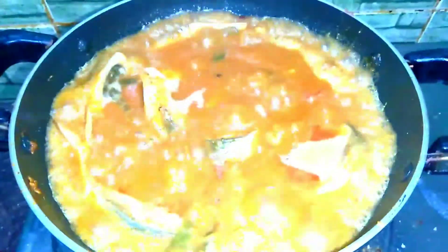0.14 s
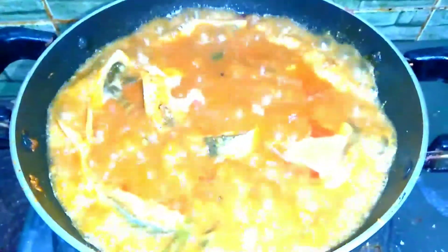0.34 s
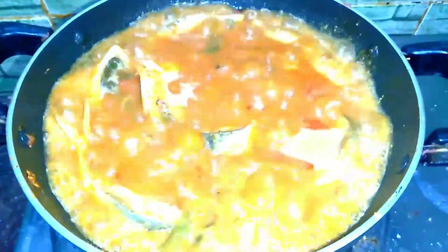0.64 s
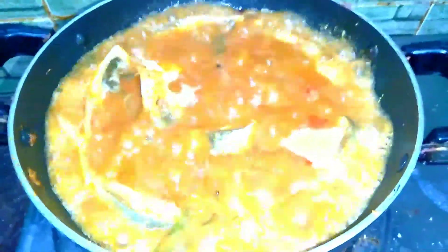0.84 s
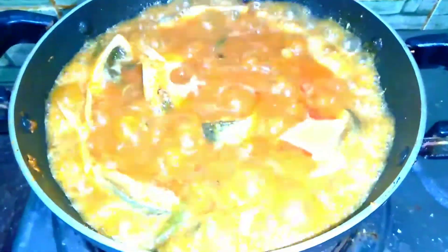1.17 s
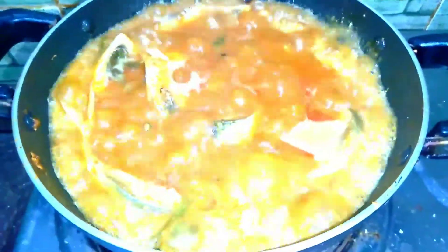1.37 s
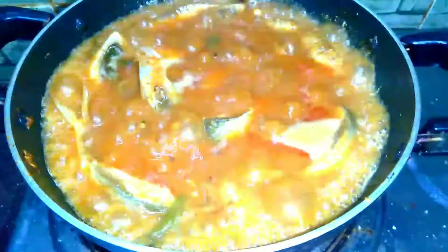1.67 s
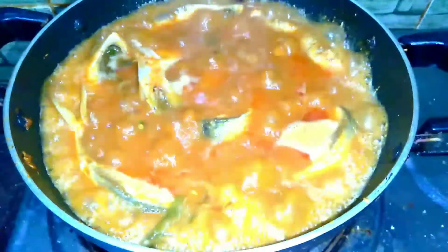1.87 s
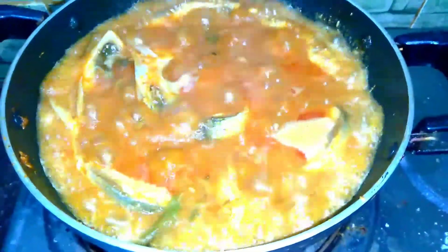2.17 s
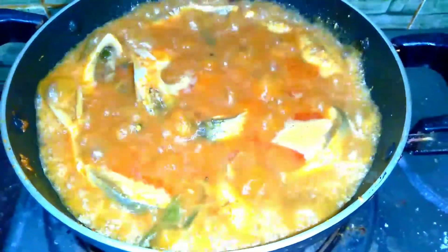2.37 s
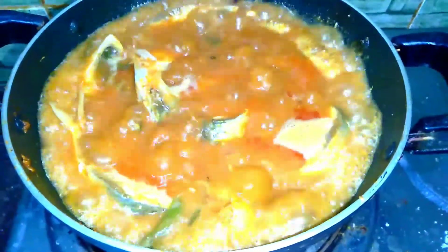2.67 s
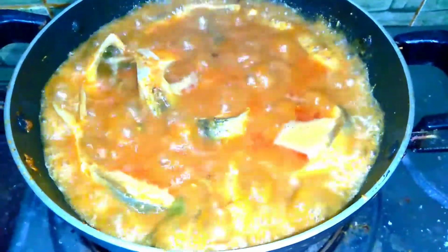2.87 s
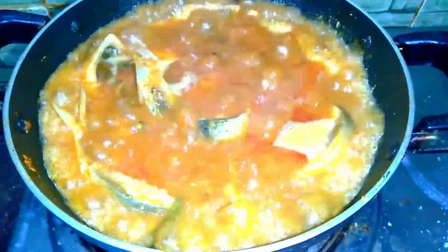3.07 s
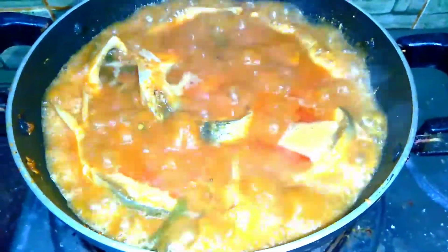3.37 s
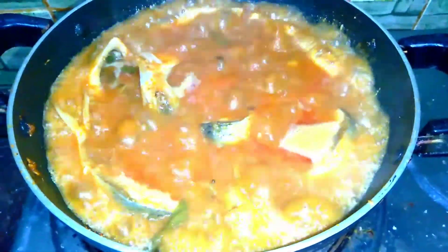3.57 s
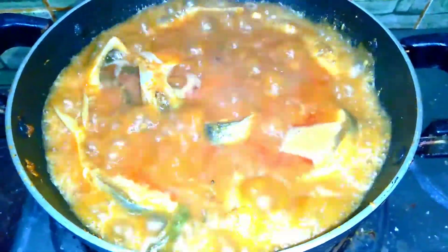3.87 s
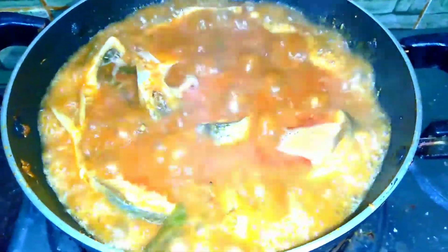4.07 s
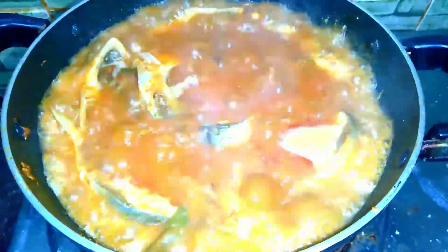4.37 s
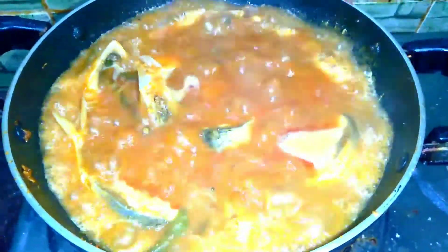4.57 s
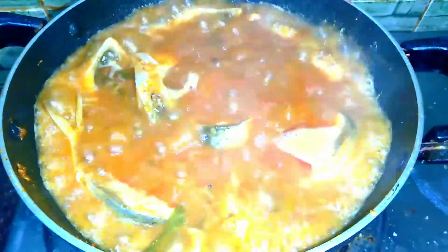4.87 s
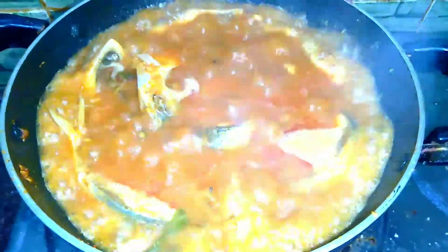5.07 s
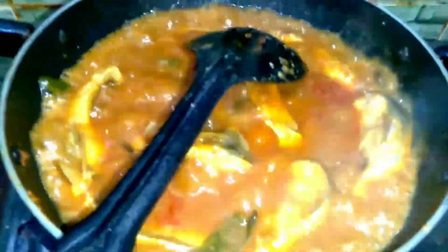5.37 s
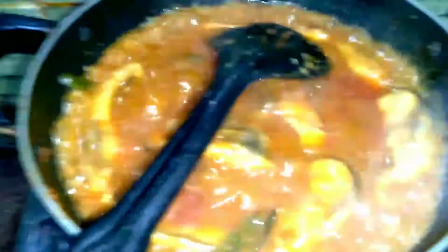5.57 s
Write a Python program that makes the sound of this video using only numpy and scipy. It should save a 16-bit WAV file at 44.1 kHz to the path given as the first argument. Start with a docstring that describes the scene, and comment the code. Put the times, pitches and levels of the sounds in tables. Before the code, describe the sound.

Thick gravy bubbles in a pan on a stove, heard close and dry. A loud cluster of pops opens it, then near quiet, then a busy run of crackles, thumps and a glug. From two seconds a faint high chirr continues under isolated snaps and soft hiss.

```python
"""Gravy simmering in a pan

Thick gravy simmers, heard dry and close, with deep bass rolled off and nothing above about 16 kHz.
Clumped random snaps in coloured noise make short gusts of sizzle; decaying resonances make sharp
pops, dull thumps and glugs. From two seconds on, two narrow noise bands form a chirr and a low burble
is heard. Filtered noise patches add streaks and wide puffs of hiss, over a very faint flickering floor."""
import sys
import numpy as np
from scipy import signal
from scipy.fft import rfft, irfft
from scipy.io import wavfile

SR = 44100
rng = np.random.default_rng(int(sys.argv[2]) if len(sys.argv) > 2 else 0)


def output_pcm(signal):
    """Save a mono or channel-first signal as 16-bit PCM at the path in sys.argv[1].

    Samples are clipped to [-1, 1] before scaling.
    """
    pcm = np.clip(np.atleast_2d(signal).T, -1, 1) * 32767
    wavfile.write(sys.argv[1], SR, np.round(pcm).astype(np.int16))


N = 251811


def amp(db):
    """Decibel law: level to amplitude gain."""
    return 10 ** (np.asarray(db) / 20)


def rms_one(x):
    """Power normalisation: scale to rms 1."""
    return x / np.sqrt(np.mean(x ** 2) + 1e-20)


def band(x, low_hz, high_hz, order=4):
    """Band-pass filtering (Butterworth), then scaling to rms 1."""
    sos = signal.butter(order, [low_hz, high_hz], "band", fs=SR, output="sos")
    return rms_one(signal.sosfilt(sos, x))


def coloured(x, spectrum):
    """Spectral shaping: weight a white signal by a curve over log frequency, rms 1."""
    hz, db = np.transpose(spectrum)
    log_hz = np.log(np.maximum(np.fft.rfftfreq(N, 1 / SR), 1))
    gain = amp(np.interp(log_hz, np.log(hz), db))
    return rms_one(irfft(rfft(x) * gain, N))


def split(x, edges_hz, sharpness=42.0):
    """Complementary crossover: neighbouring bands without a gap, each of rms 1."""
    hz = np.maximum(np.fft.rfftfreq(N, 1 / SR), 1)
    above = [np.ones(len(hz))]
    above += [1 / (1 + (edge / hz) ** sharpness) for edge in edges_hz]
    above += [np.zeros(len(hz))]
    spectrum = rfft(x)
    return np.array([rms_one(irfft(spectrum * (a - b), N)) for a, b in zip(above, above[1:])])


def shifted(x, shift_hz):
    """Single-sideband modulation: move a band by a number of Hz that may change in time."""
    phase = 2 * np.pi * np.cumsum(shift_hz) / SR
    return np.real(signal.hilbert(x) * np.exp(1j * phase))


def streaky(depth_db, hold_s, rarity=0., size=512, count=3):
    """Random modulation: narrow bands of white noise, count bins wide, flicker independently."""
    frames = signal.stft(rng.standard_normal(N), nperseg=size)[2]
    r = np.exp(-size / 2 / SR / hold_s)
    wander = signal.lfilter([1], [1, -r], rng.standard_normal(frames.shape), axis=1)
    wander *= np.sqrt(1 - r * r)
    wander = wander[np.arange(len(frames)) // count]
    flicker_db = depth_db * np.tanh(2 * (wander - rarity))
    return rms_one(signal.istft(frames * amp(flicker_db), nperseg=size)[1][:N])


def gate(start_s, length_s, first_db, last_db, rise_s, fall_s):
    """Exponential envelope (straight in dB) between linear edges: its place and its gain."""
    a = max(round(start_s * SR), 0)
    b = min(round((start_s + length_s + fall_s) * SR), N)
    t = np.arange(b - a) / SR
    edges = np.clip(np.minimum(t / rise_s, (length_s + fall_s - t) / fall_s), 0, 1)
    level_db = first_db + (last_db - first_db) * np.minimum(t / length_s, 1)
    return slice(a, b), edges * amp(level_db)


def curve_gains(rows):
    """Level interpolation in dB: one gain per column, inaudible before the first row."""
    s, *columns = np.transpose(rows)
    return [amp(np.interp(np.arange(N) / SR, s, c, left=-150)) for c in columns]


def ring(clicks, hz, t60):
    """Damped resonance: a unit click sets a sine of initial height 1 ringing."""
    r, w = amp(-60 / (t60 * SR)), 2 * np.pi * hz / SR
    return signal.lfilter([0, np.sin(w)], [1, -2 * r * np.cos(w), r * r], clicks)


# spectrum of the floor: f/Hz, relative density/dB
FLOOR_SPECTRUM = [(18, -32.5), (30, -0.5), (374, -5), (1590, -16.5), (1810, -21), (1960, -17.5),
                  (16000, -15)]
FLOOR_DB = -77


def floor():
    """Stationary coloured noise: a faint floor whose narrow bands flicker."""
    return amp(FLOOR_DB) * coloured(streaky(depth_db=5.0, hold_s=0.15), FLOOR_SPECTRUM)


# low burble of the simmer: t/s, level/dB
SIMMER_LEVELS = [(2.0, -65.5), (2.42, -71), (2.73, -74.5), (4.67, -75.5), (5.23, -67.5), (5.71, -78.5)]


def simmer():
    """Low-frequency band noise: the burble of the simmer flickers bin by bin."""
    burble = band(streaky(depth_db=8, hold_s=0.08, size=1024, count=1), 29, 125, order=2)
    return curve_gains(SIMMER_LEVELS)[0] * burble


# levels of the chirr: t/s, lower band level/dB, upper band level/dB, hiss around them level/dB
CHIRR_LEVELS = [(2.0, -81, -50.5, -55), (2.14, -66.5, -59, -65), (2.6, -63.5, -58.5, -65.5),
                (3.25, -61.5, -60, -76), (3.71, -63, -59.5, -68), (4.63, -59.5, -62, -73),
                (4.99, -57, -58.5, -69.5), (5.49, -59, -56, -67), (5.71, -57.5, -56, -58.5)]
# each chirr band: lower edge f/Hz, end of the crest f/Hz, end of the shoulder f/Hz
LOWER_CHIRR, UPPER_CHIRR = (3952, 4400, 4780), (7400, 7850, 8450)
# weaker band between the two: lower edge f/Hz, upper edge f/Hz
MIDDLE_CHIRR = (6200, 6800)
# common drift in pitch of the two main bands: t/s, shift f/Hz
CHIRR_DRIFT_HZ = [(2.002, -90), (3.302, 40.5), (3.9, 120.5), (4.302, 1.5), (5, -60), (5.7, 80)]


def chirr(mid_db=-3, flank_db=-12, flank_hz=250, shoulder_db=-5.5):
    """Narrow-band noise: two drifting bands, a weaker one between, thin lines and a faint bed."""
    low, high, around = curve_gains(CHIRR_LEVELS)
    hiss = streaky(depth_db=5.0, hold_s=0.089)
    wavering = streaky(depth_db=8.5, hold_s=0.38)
    lines = streaky(depth_db=15, hold_s=.2, rarity=.9)
    middle = amp(mid_db) * band(wavering, *MIDDLE_CHIRR)
    out = around * (band(lines, 2090, 9000, order=3) + middle)
    out += amp(-31) * high * band(rng.standard_normal(N), 500, 13000, order=2)   # the bed
    drift_hz = np.interp(np.arange(N) / SR, *np.transpose(CHIRR_DRIFT_HZ))
    for gain, (low_hz, crest_hz, high_hz) in ((low, LOWER_CHIRR), (high, UPPER_CHIRR)):
        crest = band(hiss, low_hz, crest_hz, order=3)
        shoulder = amp(shoulder_db) * band(wavering, crest_hz, high_hz, order=4)
        flanks = amp(flank_db) * band(lines, low_hz - flank_hz, high_hz + flank_hz, order=5)
        out += gain * shifted(rms_one(crest + shoulder + flanks), drift_hz)
    return out


PATCH_WANDER, PATCH_WANDER_S = .016, .08   # largest stray as a share of the centre, knot spacing


def patches(rows, hiss, rise_s):
    """Band-limited noise bursts whose pitch strays, from start, length, centre, width and levels."""
    out = np.zeros(N)
    knots = np.arange(0, N / SR + 1, PATCH_WANDER_S)
    stray = rng.uniform(-0.96, 1, len(knots))
    wander = PATCH_WANDER * np.interp(np.arange(N) / SR, knots, stray)
    for start, length, hz, width_hz, db, change_db in rows:
        where, gain = gate(start, length, db, db + change_db, rise_s, fall_s=0.018)
        patch = band(hiss[where], hz - width_hz / 2, hz + width_hz / 2, order=3)
        out[where] += gain * shifted(patch, hz * wander[where])
    return out


# wide puffs of hiss: start t/s, length t/s, centre f/Hz, width f/Hz, first level/dB
PUFF_ROWS = [(0.428, 0.24, 8830, 5890, -65.5), (0.915, 0.26, 2300, 1990, -58),
             (2.085, 1.3, 5650, 6476, -68.5), (2.397, 0.035, 7760, 5000, -41),
             (2.496, 0.27, 5100, 4450, -55.5), (2.51, 0.097, 12800, 2500, -56),
             (3.1, 0.21, 2586, 1115, -61), (3.294, 0.094, 8740, 4970, -51), (3.665, 0.19, 11000, 4270, -54),
             (3.662, 0.24, 6500, 1980, -55), (3.816, 0.032, 8800, 4020, -43.5),
             (4.247, 0.33, 3070, 1460, -54.5), (4.249, 0.25, 7520, 3000, -54.5),
             (4.811, 0.36, 7400, 2660, -47), (4.79, 0.15, 11500, 5300, -48.5),
             (5.065, 0.23, 10900, 3000, -66), (5.573, 0.46, 3240, 1890, -55),
             (5.585, 0.048, 13300, 1980, -64)]
PUFF_FADE_DB, PUFF_RISE_S = -36, 0.019


def puffs():
    """Exponential decay of broad noise: puffs that fade alike and break up into thin lines."""
    broken = streaky(depth_db=8, hold_s=.12, rarity=.1)
    return patches([(*row, PUFF_FADE_DB) for row in PUFF_ROWS], broken, PUFF_RISE_S)


# narrow streaks of hiss: start t/s, length t/s, centre f/Hz, first level/dB, change of level/dB
STREAK_ROWS = [(0, 0.041, 2210, -48, -25), (0.758, 0.014, 1260, -66, 7), (4.684, 0.51, 2694, -65.5, -14.5),
               (0.401, 0.23, 1848, -67, -9.5), (0.44, 0.07, 375, -70.5, -7),
               (0.624, 0.047, 402, -63.5, -11), (0.554, 0.23, 7020, -78.5, 2.5),
               (0.74, 0.031, 2294, -51.5, 2), (0.77, 0.11, 2500, -67.5, -5.5), (0.916, 0.1, 2714, -58.5, 0),
               (0.916, 0.1, 1180, -51, -30), (0.918, 0.056, 1730, -67, -6), (2.082, 1, 2416, -72.5, -18),
               (1.998, 0.15, 495, -59.5, -22), (3.424, 0.069, 3260, -33.5, -11),
               (2.424, 0.1, 343, -62.5, -10.5), (2.884, 0.297, 2790, -64, -4.5),
               (3.429, 0.065, 1334, -55, -14.5), (3.704, .12, 1864, -70.5, -5.5),
               (4.36, 0.092, 800, -68.5, -19), (4.517, 0.16, 3140, -67.5, 10),
               (4.593, 0.3, 2930, -59, -12.5), (4.738, 0.058, 917, -56, -8),
               (4.796, 0.16, 4010, -47.5, -5.5), (4.869, 0.31, 1894, -52.5, -16),
               (5.004, 0.28, 2260, -58, -11), (5.487, 0.067, 676, -72, -6.5)]
# width = base + share of the centre; the share grows when the length nears the spread time
STREAK_WIDTH_HZ, STREAK_WIDTH_SHARE, STREAK_SPREAD_S = 31, 0.068, 0.037
STREAK_RISE_S = 0.014


def streaks():
    """Time-bandwidth reciprocity: fluttering streaks of hiss, broader when they are short."""
    rows = []
    for start, length, hz, db, change_db in STREAK_ROWS:
        share = STREAK_WIDTH_SHARE * (1 + STREAK_SPREAD_S / length)
        rows.append((start, length, hz, STREAK_WIDTH_HZ + share * hz, db, change_db))
    return patches(rows, streaky(depth_db=3.0, hold_s=0.014), STREAK_RISE_S)


# low glugs: t/s, peak level/dB, first f/Hz, last f/Hz, time constant of the drop t/s, t60 t/s
GLUG_ROWS = [(1.4211, -14.5, 1077, 146, 0.00056, 0.014), (1.751, -32.5, 160, 85, 0.0089, 0.096),
             (2.255, -45.5, 282, 121.4, 0.011, 0.18)]


def glugs(rise_share=.7):
    """Gliding damped oscillation: a big bubble heaves out in one swell, sliding down in pitch."""
    out, t = np.zeros(N), np.arange(4000) / SR
    for s, db, first_hz, last_hz, drop_s, t60 in GLUG_ROWS:
        hz = last_hz + (first_hz - last_hz) * np.exp(-t / drop_s)
        swell = (1 - np.exp(-t / (rise_share * drop_s))) * amp(-60 * t / t60)
        wave = np.sin(2 * np.pi * np.cumsum(hz) / SR)
        start = round(s * SR)
        out[start:start + len(t)] -= amp(db) * swell / swell.max() * wave
    return out


# bursting bubbles: t/s, skin peak level/dB, ring f/Hz, thump gain relative to the skin peak level/dB
POP_ROWS = [(0.041, -28.5, 11200, 25.5), (0.0692, -9.5, 8300, -8), (0.086, 2.5, 8200, -22),
            (0.093, -1.5, 5700, -34), (0.0975, -3, 4730, -29), (0.106, -16, 5300, -35),
            (0.1159, 5, 5600, -39), (0.1208, -0.5, 4870, -36), (0.1251, 0, 8400, -8),
            (1.4057, -14, 8900, -37), (1.4055, -24, 1700, -27), (1.413, -6, 9500, -17),
            (1.422, -11, 5400, -28), (1.4922, -19, 5800, -8), (1.492, -24, 2010, -18),
            (1.5102, -25, 1530, -15), (1.6322, -14.5, 8500, -41), (1.705, -4, 8500, -38),
            (1.7055, -17.5, 1380, -15), (1.712, -13.5, 4150, -17), (1.7497, -11.5, 9050, -2),
            (1.753, -17, 4160, -30), (1.799, -26, 686, -15), (1.8808, -7, 3780, -40),
            (1.881, -1, 7550, -18.5), (1.8803, -15.5, 13800, -38), (1.918, -31, 8500, -8),
            (1.944, -13.5, 12600, -15), (1.944, -15, 4400, -28), (1.9509, -11, 4860, -35),
            (1.982, -25.5, 8400, -27), (1.986, -36, 530, 10.5), (2.009, -32, 8100, -25),
            (2.265, -31, 7800, -20), (2.2755, -50, 8300, -12), (2.274, -57, 4250, -1.5),
            (2.68, -21, 7340, 8), (2.677, -16.5, 7100, -1), (2.902, -55, 410, 12.5),
            (4.0251, -18, 4660, -10.5), (4.0285, -31.5, 7950, -18), (4.0274, -13.5, 13000, -15),
            (4.027, -33, 457, -22), (4.746, -50, 1030, -23.5), (4.768, -48.5, 840, -20),
            (4.7693, -23.5, 7700, -27), (4.7865, -31, 8850, -15), (5.224, -13, 7300, -21),
            (5.224, -25, 880, -22)]
POP_CYCLES, POP_LONGEST_S = 13, 0.0097   # t60 of the ring in cycles; thick gravy limits it
CRACK_DB, CRACK_TOP_HZ = -24, 8660
THUMP_HZ, THUMP_T60_S, THUMP_PUSH_S = 147, 0.011, 0.003   # the air is pushed softly


def pops():
    """Impulse response: a bubble's skin cracks and rings a few cycles; the pushed air thumps."""
    size = 4000
    out = np.zeros(N + size)
    cracks = rng.standard_normal((len(POP_ROWS), 40)) * signal.windows.hann(40) ** 2
    cracks = signal.lfilter(*signal.butter(2, CRACK_TOP_HZ, fs=SR), cracks)
    click = np.eye(1, size, 14)[0]
    push = signal.windows.hann(round(THUMP_PUSH_S * SR))
    thump = np.convolve(ring(click, THUMP_HZ, THUMP_T60_S), push / push.sum())[:size]
    for (s, db, hz, thump_db), crack in zip(POP_ROWS, cracks):
        t60 = min(POP_CYCLES / hz, POP_LONGEST_S)
        skin = np.convolve(ring(click, hz, t60), [.5, 1, .5], "same")   # softens the onset
        skin = signal.lfilter(*signal.butter(1, hz / 2, "high", fs=SR), skin)
        skin[:40] += amp(CRACK_DB) * crack
        sound = skin / np.max(np.abs(skin)) + amp(thump_db) * thump
        start = round(s * SR)
        out[start:start + size] += amp(db) * sound
    return out[:N]


# spectrum of the sizzle: f/Hz, relative density/dB
SIZZLE_SPECTRUM = [(35, -23), (60, -1), (330, -10), (417, -10.5), (607, -14), (1200, -14.5), (1280, -16),
                   (1470, -13.5), (3300, -11), (4300, -4.5), (6100, -13.5), (8510, -9), (14900, -20.5)]
# edges between rumble, body, presence, core and air: f/Hz
GUST_BAND_EDGES = [300, 2000, 6000, 10000]
# gusts: (presence, air, body, rumble level/dB relative to the core at its loudest),
# then the core's curve: t/s, level/dB
GUST_ROWS = [((-6.5, -0.5, -9.5, -13.5), [(0, -46), (.036, -60), (.045, -39.5), (.08, -27), (.11, -27),
             (.115, -20.5), (.1245, -19), (.128, -39), (.14, -60.5), (.245, -57.5), (.332, -70.5)]),
             ((-31, -0.5, -29.5, -27), [(.61, -68.5), (.65, -58.5), (.73, -65.5), (.745, -49), (.775, -44),
             (.785, -60), (.875, -61), (.92, -49.5), (.926, -38), (1.032, -44), (1.038, -56.5),
             (1.13, -83)]), ((-3.5, -3.5, -7, -20.5), [(1.4, -62.5), (1.406, -42.5), (1.43, -27.5),
             (1.455, -29.5), (1.462, -49.5), (1.489, -43), (1.495, -32), (1.51, -30), (1.55, -34),
             (1.58, -31.5), (1.6, -37), (1.645, -46.5)]), ((-2.5, -5.5, -6, -13.5), [(1.645, -42),
             (1.695, -34), (1.712, -24.5), (1.72, -34), (1.755, -34), (1.785, -40), (1.795, -30),
             (1.825, -40), (1.879, -40.5), (1.884, -53), (1.91, -52), (1.915, -47.5), (1.94, -49),
             (1.945, -32.5), (1.953, -39.5), (1.958, -49.5), (1.99, -43.5), (2.01, -38), (2.024, -54),
             (2.083, -51.5)]), ((-7.5, -13, -46, -14.5), [(2.254, -47), (2.263, -34.5), (2.269, -40),
             (2.276, -29.5), (2.281, -45), (2.317, -47)]), ((-5, -7.5, -9.5, -18), [(2.674, -39),
             (2.681, -19), (2.693, -46), (2.738, -48), (2.744, -40), (2.77, -48.5), (2.776, -41),
             (2.8, -59), (2.89, -93)]), ((-9, -7, -47, -14), [(2.903, -46.5), (3.03, -80)]),
             ((-5, -13.5, -45, -22), [(3.085, -47.5), (3.18, -72)]), ((5, -16.5, -29.5, -36), [(3.424, -57),
             (3.432, -36), (3.5, -45), (3.504, -55.5), (3.66, -82)]), ((-1, 2.5, -8, -10.5), [(4.02, -42.5),
             (4.028, -33), (4.034, -47), (4.051, -40), (4.056, -57.5), (4.13, -77.5)]),
             ((-10.5, -0.5, -21.5, -46), [(4.742, -60), (4.7665, -49), (4.768, -41), (4.772, -51),
             (4.788, -44), (4.793, -53)]), ((-1.5, -6.5, -5.5, -18.5), [(5.2, -59), (5.22, -61),
             (5.224, -23.5), (5.228, -44), (5.237, -41), (5.241, -55), (5.36, -75)]),
             ((9, -20.5, -20.5, -27.5), [(5.498, -68), (5.572, -66), (5.58, -58), (5.672, -66),
             (5.684, -58), (5.72, -60)])]
FAINT_DB = -46   # a gust is streaky until it first reaches this level
RUMBLE_FOLLOWS, AIR_FOLLOWS = 0.61, 1.06   # share of the core's swing in dB
GUST_EDGE_S = .002


def gusts(per_s=9000, spread_db=4.0, hiss_db=-2, clump_db=2.5, clump_s=.004):
    """Shot noise: droplets snap in clumps in hot fat; the rumble swings less, the air more."""
    snap_db = spread_db * np.minimum(rng.exponential(1, N), 4)
    snaps = (rng.random(N) < per_s / SR) * amp(snap_db) * rng.choice([-1, 1], N)
    even = rms_one(snaps) + amp(hiss_db) * streaky(depth_db=1.0, hold_s=0.034)
    knots = np.arange(0, N, clump_s * SR)
    clumps = np.interp(np.arange(N), knots, rng.standard_normal(len(knots)))
    even = even * amp(clump_db * clumps)
    thin = streaky(depth_db=9, hold_s=.25, rarity=.1)
    even = split(coloured(even, SIZZLE_SPECTRUM), GUST_BAND_EDGES)
    thin = split(coloured(thin, SIZZLE_SPECTRUM), GUST_BAND_EDGES)
    follows = np.array([[RUMBLE_FOLLOWS], [1], [1], [1], [AIR_FOLLOWS]])
    out = np.zeros(N)
    for (presence_db, air_db, body_db, rumble_db), points in GUST_ROWS:
        s, db = np.transpose(points)
        where, edges = gate(s[0], s[-1] - s[0], 0, 0, rise_s=GUST_EDGE_S / 2, fall_s=GUST_EDGE_S)
        level_db = np.interp(np.arange(where.start, where.stop) / SR, s, db)
        colour_db = np.array([[rumble_db], [body_db], [presence_db], [0], [air_db]])
        still_faint = np.maximum.accumulate(level_db) < FAINT_DB
        grain = np.where(still_faint, thin[:, where], even[:, where])
        gains = amp(db.max() + colour_db + follows * (level_db - db.max()))
        out[where] += edges * np.sum(gains * grain, axis=0)
    return out


def scene():
    """Superposition: all layers add up in one channel."""
    background = floor() + simmer() + chirr() + puffs() + streaks()
    return (background + glugs() + pops() + gusts())[None, :]


BASS_EDGE_HZ = 64
TOP_EDGE_HZ, TOP_END_HZ = 15900, 16700   # stop-band edges, 26 dB and 70 dB down
OVERLOAD = .66   # amplitude ceiling of the soft saturation


def record(dry):
    """Band limitation and saturation: deep bass rolls off, peaks round, the top ends near 16 kHz."""
    heard = signal.sosfilt(signal.butter(3, BASS_EDGE_HZ, "high", fs=SR, output="sos"), dry)
    heard = OVERLOAD * np.tanh(heard / OVERLOAD)
    heard = signal.sosfilt(signal.cheby2(12, 26, TOP_EDGE_HZ, fs=SR, output="sos"), heard)
    return signal.sosfilt(signal.cheby2(12, 70, TOP_END_HZ, fs=SR, output="sos"), heard)


dry = scene()
out = record(dry)
output_pcm(out)
```